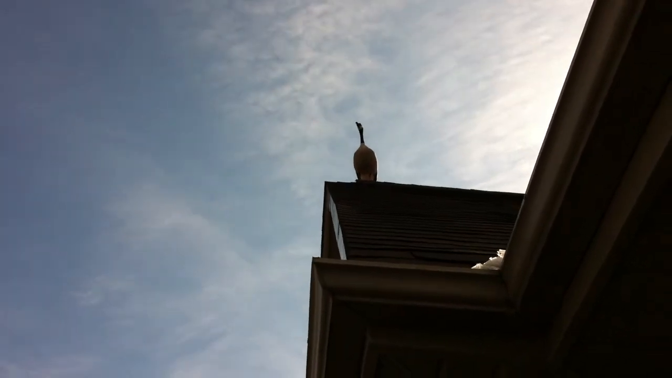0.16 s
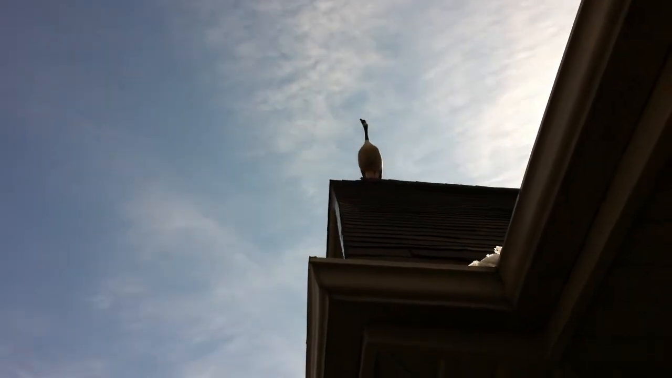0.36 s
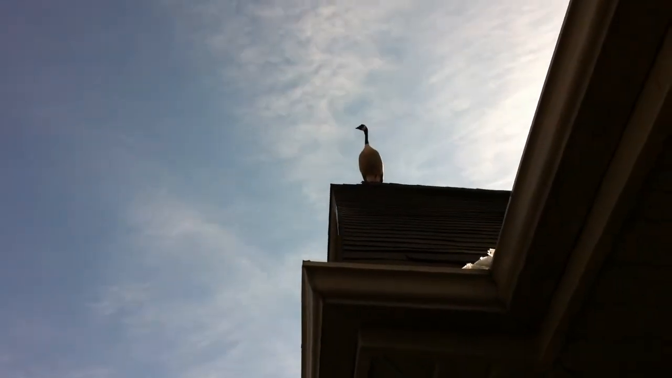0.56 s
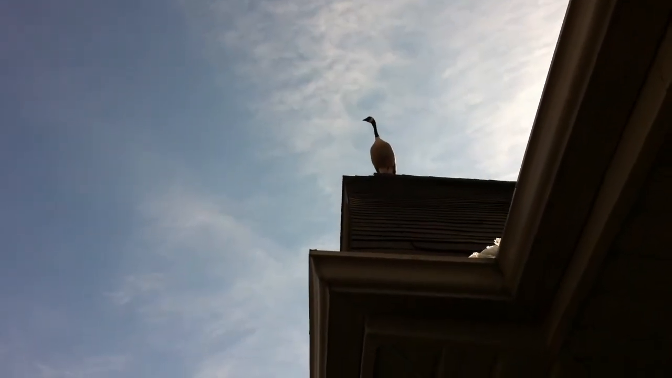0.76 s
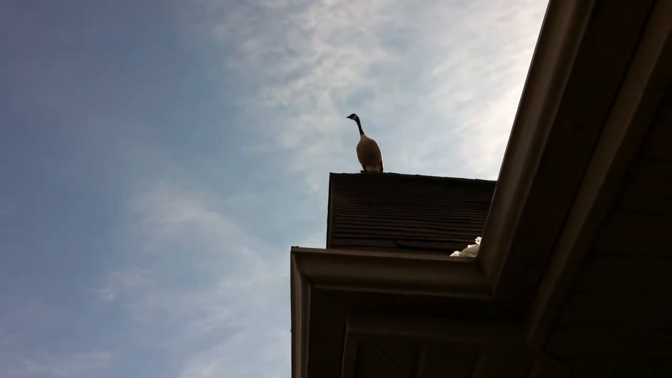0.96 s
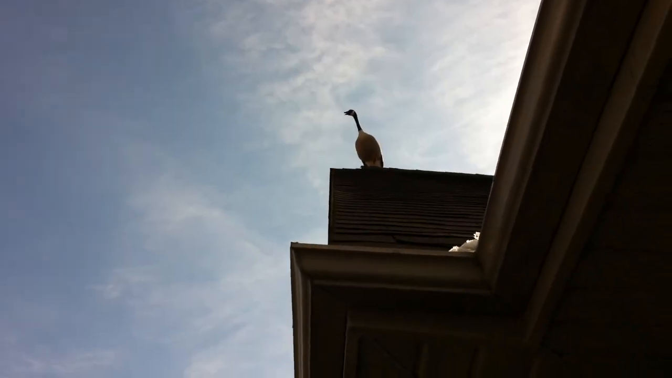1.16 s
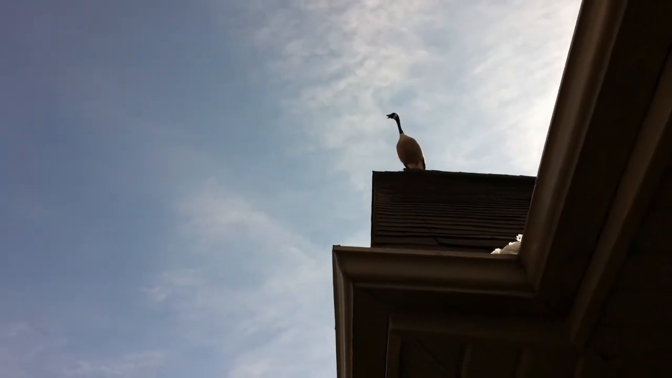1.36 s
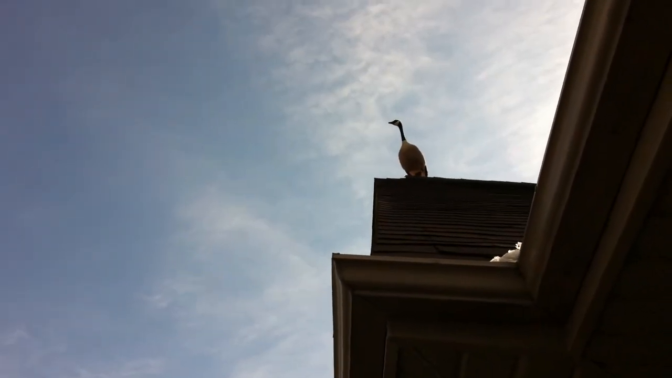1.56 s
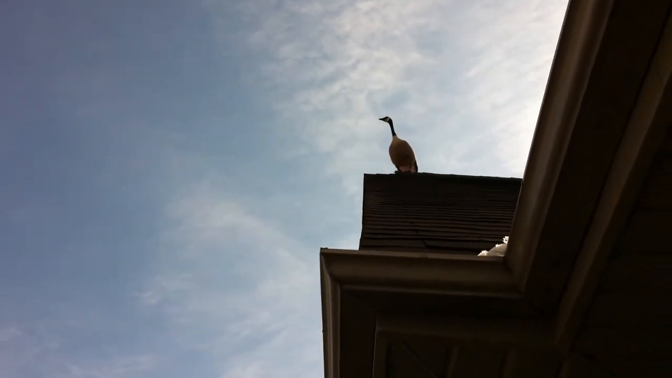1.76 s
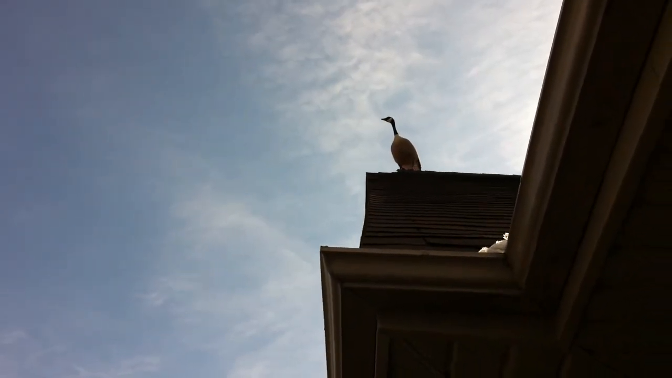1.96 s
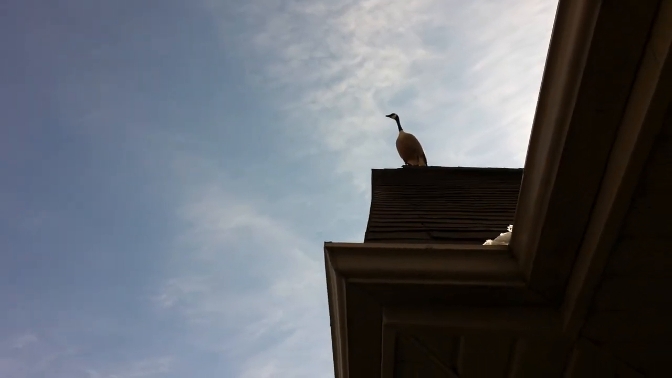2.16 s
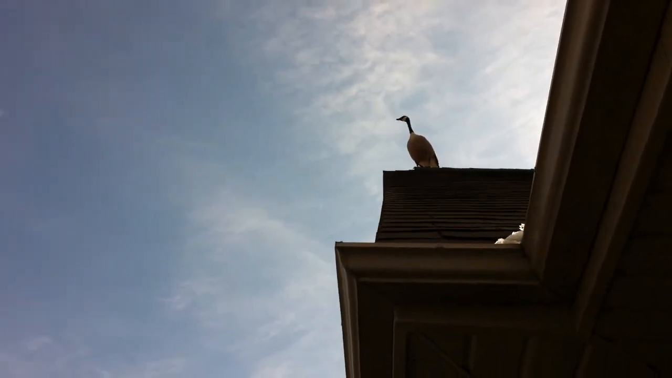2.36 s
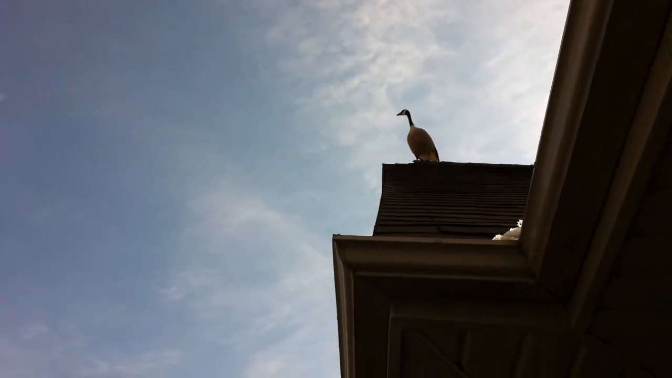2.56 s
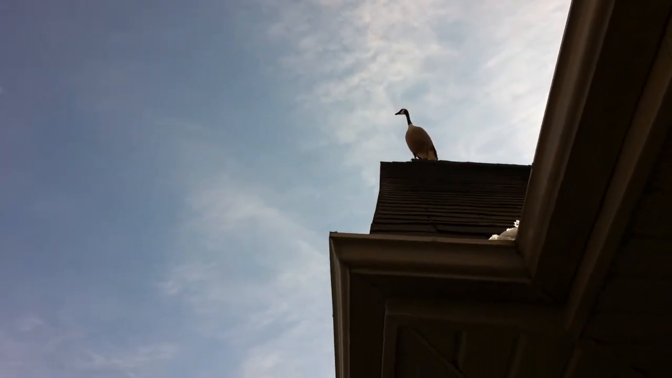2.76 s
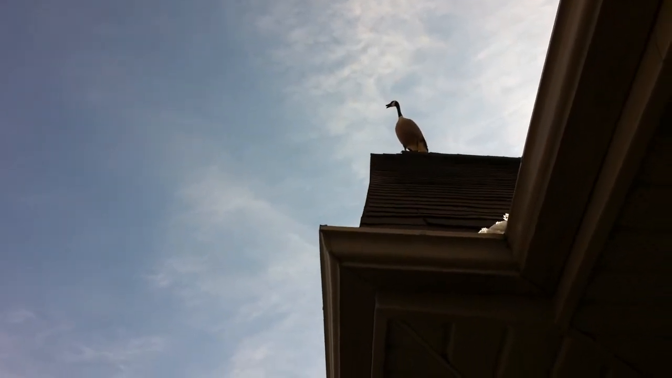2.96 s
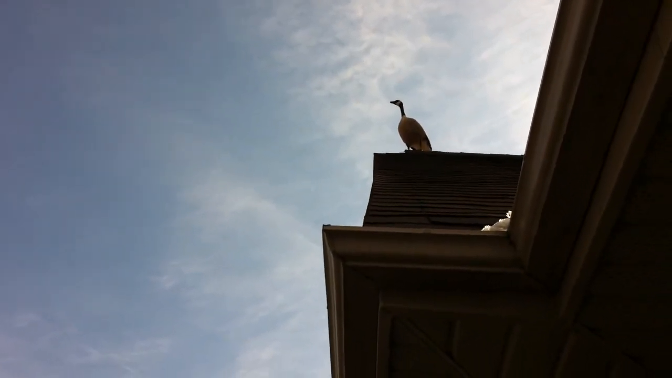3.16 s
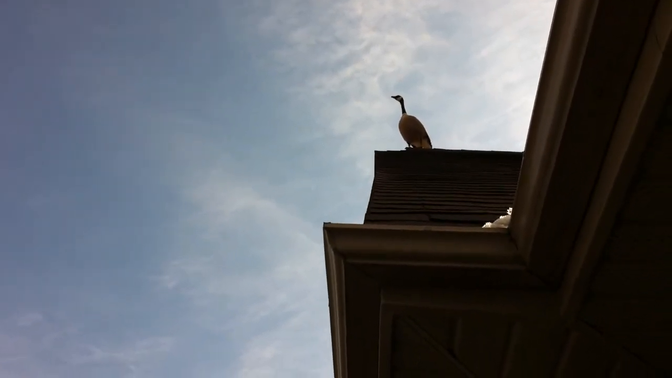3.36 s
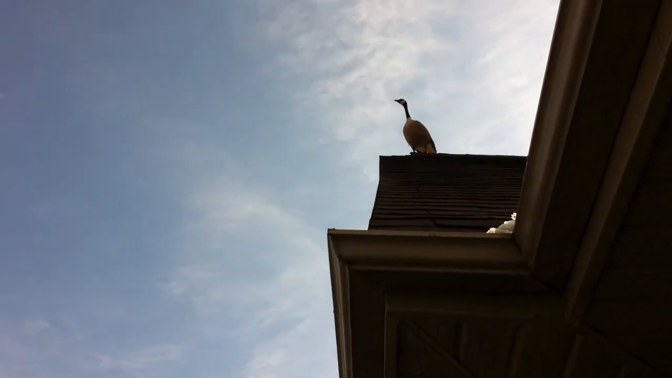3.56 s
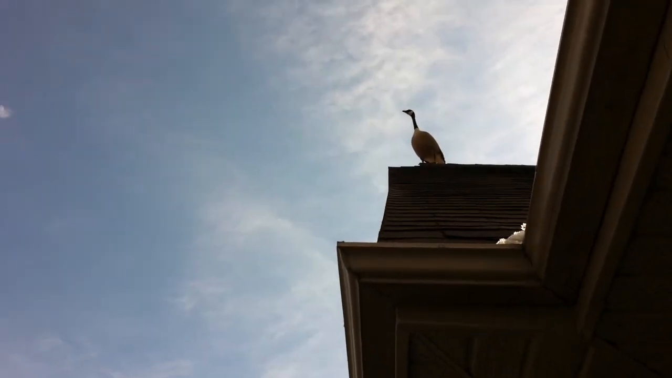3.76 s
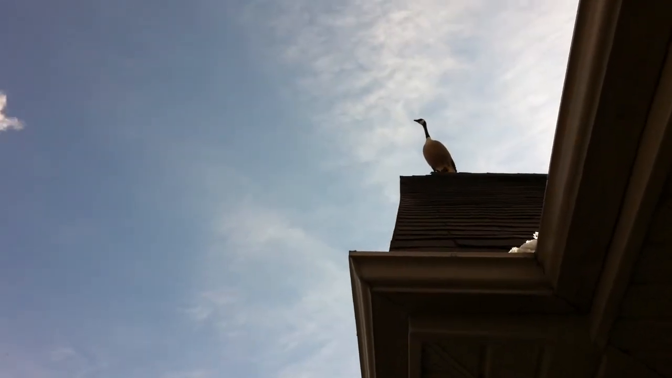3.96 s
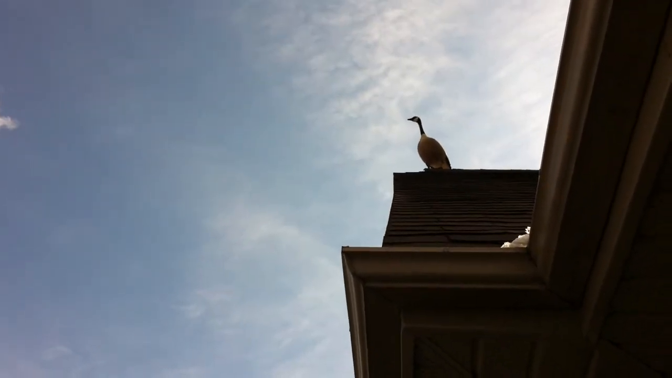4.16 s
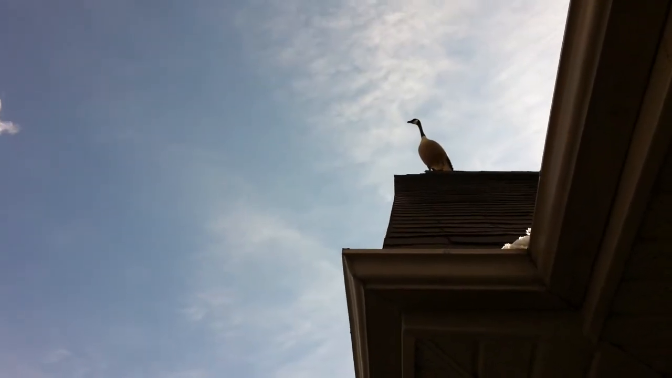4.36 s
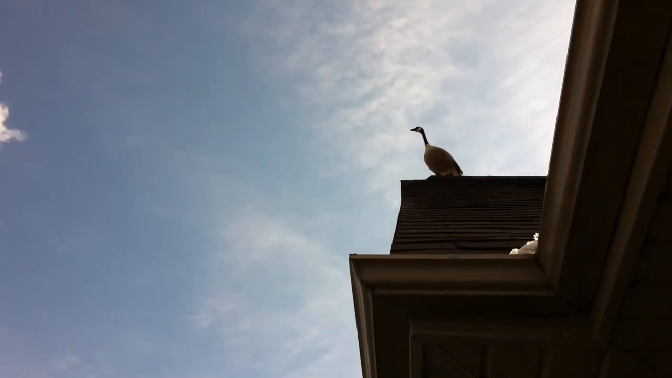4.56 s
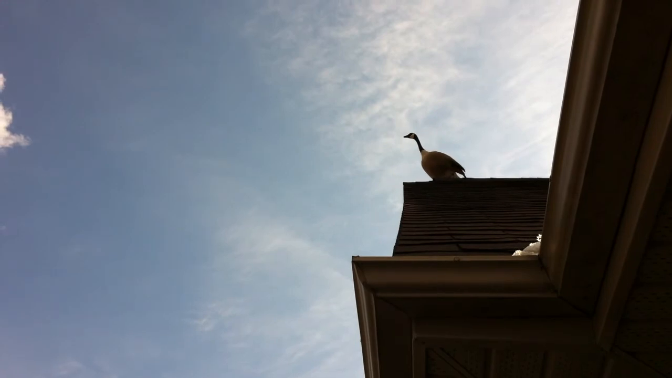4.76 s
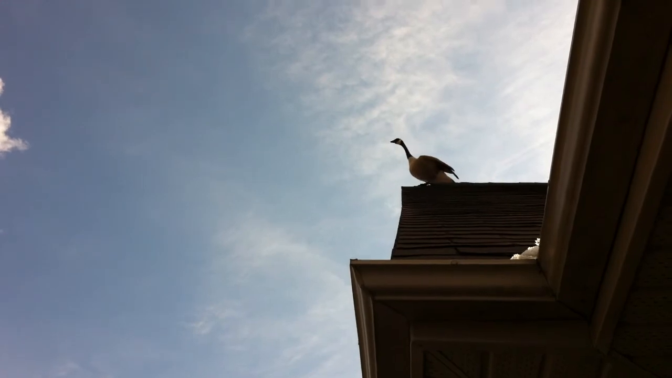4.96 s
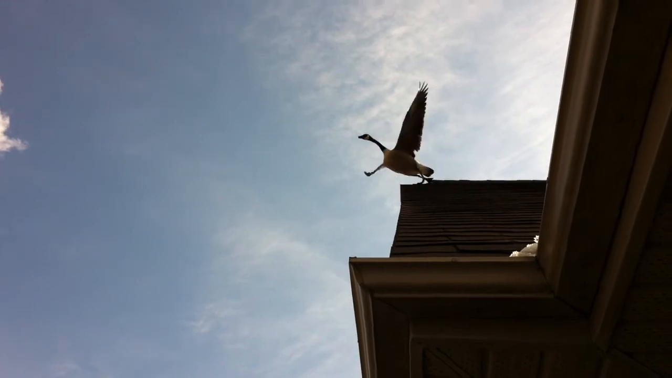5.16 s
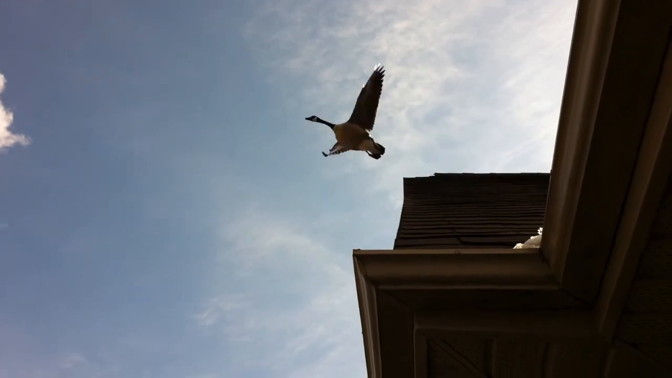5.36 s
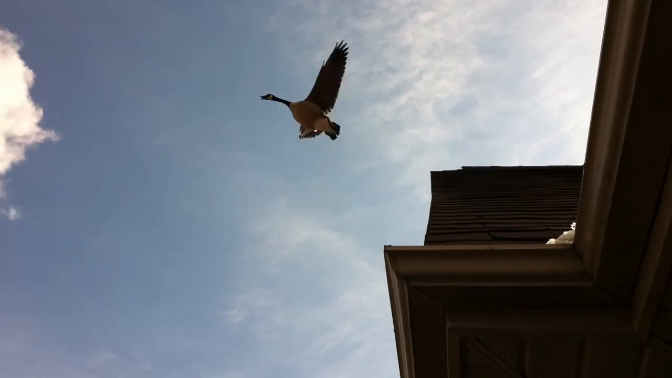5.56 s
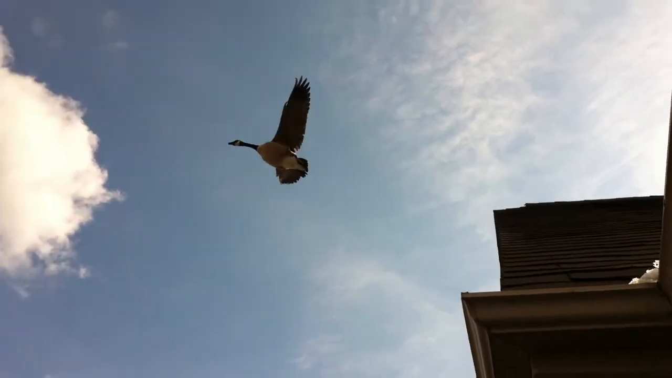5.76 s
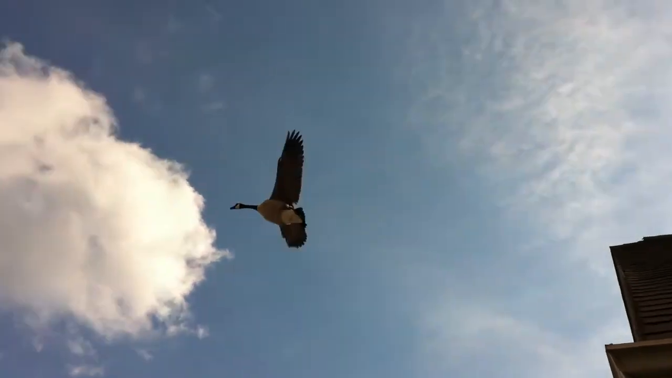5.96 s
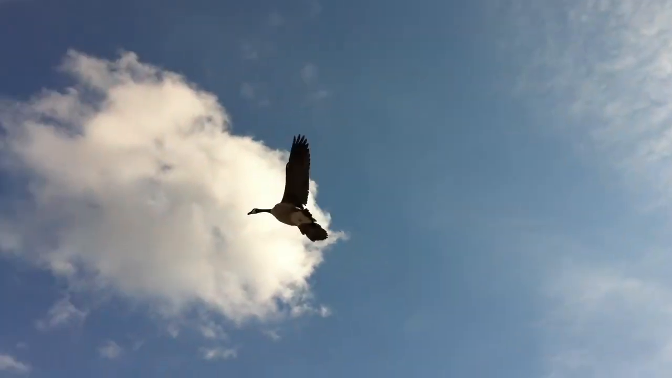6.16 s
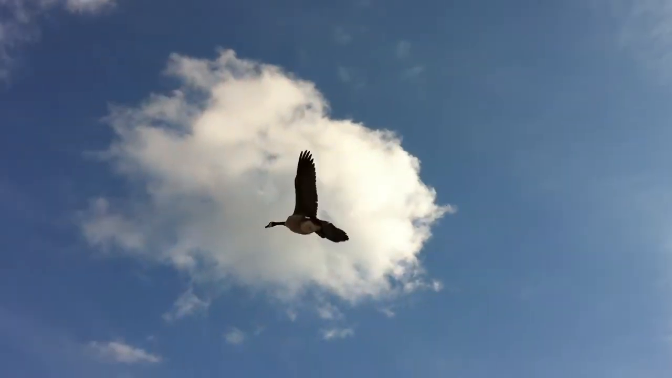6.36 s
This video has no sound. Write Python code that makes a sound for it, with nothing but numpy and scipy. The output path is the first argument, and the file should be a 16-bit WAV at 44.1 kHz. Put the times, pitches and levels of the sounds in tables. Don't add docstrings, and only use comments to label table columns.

```python
import sys
import numpy as np
from scipy import signal
from scipy.io import wavfile
from scipy.ndimage import uniform_filter1d

SR = 44100
rng = np.random.default_rng(int(sys.argv[2]) if len(sys.argv) > 2 else 0)


def invert_db(level):
    return 10 ** (np.asarray(level, dtype=float) / 20)


def bounce(signal):
    frames = np.transpose(np.atleast_2d(signal))
    limited = np.clip(frames, -1, 1)
    pcm = np.round(limited * 32767).astype(np.int16)
    wavfile.write(sys.argv[1], SR, pcm)


N = 282681
SECONDS = np.arange(N) / SR


def rms_one(x):
    return x / np.sqrt(np.mean(x ** 2) + 1e-20)


def band(x, hz, kind, order=4):
    return signal.sosfilt(signal.butter(order, hz, kind, fs=SR, output="sos"), x)


def resonate(x, hz, width):
    r = np.exp(-np.pi * width / SR)
    top = [(1 - r * r) / 2, 0, (r * r - 1) / 2]
    return signal.lfilter(top, [1, -2 * r * np.cos(2 * np.pi * hz / SR), r * r], x)


def drift(rate, size):
    r = np.exp(-2 * np.pi * rate / SR)
    settle = 9000
    slow = signal.lfilter([1], [1, -2 * r, r * r], rng.standard_normal(size + settle))
    return rms_one(slow[settle:])


def in_time(rows, fade):
    s, *columns = np.transpose(rows)
    t = np.arange(s[0] - fade - 900 / SR, min(s[-1] + fade, N / SR - 1e-3), 1 / SR)
    gate = np.clip(np.minimum(t - s[0], s[-1] - t) / fade + 1, 0, 1) ** 2
    return round(t[0] * SR), [np.interp(t, s, c) for c in columns], gate


def coloured(spectrum, patchy_db, rate):
    hz, db = np.transpose(spectrum)
    edges = np.geomspace(hz[0], hz[-1], 16)
    together = drift(rate, N)
    white = rng.standard_normal((2, N))
    out = np.zeros(N)
    for k, (low, high) in enumerate(zip(edges, edges[1:])):
        level_db = np.interp(np.log(low * high) / 2, np.log(hz), db)
        flicker_db = patchy_db * (1.23 * together + drift(6.3, N))
        out += invert_db(level_db + flicker_db) * band(white[k % 2], [low, high], "band", order=2)
    return rms_one(out)


# t/s, level/dB
AIR_STIR = [(0, -1), (1.0, -1), (2.0, -2.5), (3.0, -1), (3.6, 2), (4.15, 1.5), (4.5, 5), (5.0, 6.5),
            (5.37, 7.5), (5.84, 7.5), (6.41, 9)]


def air_stir():
    return np.interp(SECONDS, *np.transpose(AIR_STIR))


# f/Hz, level/dB per Hz
WIND_COLOUR = [(12, -65), (20, -28), (38, -19.5), (92, -10.5), (157, 6), (392, 3), (433, 0.5), (600, -37),
               (780, -40), (1320, -120)]


def wind(stir_db):
    return invert_db(-58 + stir_db) * coloured(WIND_COLOUR, patchy_db=1.0, rate=3.0)


# f/Hz, level/dB per Hz
TRAFFIC_COLOUR = [(180, -8), (300, -25), (361, 1), (473, -8.5), (691, 1), (849, -4), (1080, -4), (1590, -9),
                  (2560, -27.5), (4000, -42), (5200, -16.5), (8800, -120)]


def traffic(stir_db, honk_level):
    level = invert_db(-52.5 + 0.92 * stir_db) + invert_db(-27) * honk_level
    return level * coloured(TRAFFIC_COLOUR, patchy_db=1.6, rate=0.71)


def rush(stir_db, honk_level):
    level = invert_db(-83.5 + 2.1 * stir_db) + invert_db(-34) * honk_level
    return level * rms_one(band(rng.standard_normal(N), [1700, 3600], "band", order=1))


def hiss():
    return invert_db(-70) * rms_one(band(rng.standard_normal(N), 2100, "high", order=1))


# t/s, f/Hz, level/dB
WHISTLES = [
    [(2.42, 3120, -76), (2.45, 3020, -70), (2.49, 2920, -74)],
    [(2.51, 3130, -75), (2.55, 3090, -71), (2.6, 3060, -78)],
]


def songbird():
    out = np.zeros(N)
    for rows in WHISTLES:
        start, (hz, db), gate = in_time(rows, 0.0067)
        turn = 2 * np.pi * np.cumsum(hz) / SR
        out[start:start + len(gate)] += invert_db(db) * gate * (np.sin(turn) + .55 * np.sin(1.27 * turn))
    return out


# t/s, peak level/dB
FEATHER_CLAPS = [
    (4.0194, -53),
    (5.1647, -48),
    (5.1834, -43),
    (5.219, -40.5),
    (5.357, -40),
    (5.3613, -35.5),
    (5.5894, -66),
    (5.9094, -57),
]
# t/s, level/dB
STROKES = [
    (5.12, -70),
    (5.37, -58),
    (5.591, -60),
    (5.9, -62.5),
    (6.19, -65),
]


def wings():
    out = np.zeros(N)
    t = np.arange(2000) / SR
    t60_s = 0.019
    for s, db in FEATHER_CLAPS:
        burst = resonate(rng.standard_normal(len(t)), hz=8000, width=5100) * invert_db(-60 * t / t60_s)
        start = round(s * SR)
        out[start:start + len(t)] += invert_db(db) * burst / np.abs(burst).max()
    strokes = sum(invert_db(db) * np.exp(-((SECONDS - s) / .045) ** 2) for s, db in STROKES)
    swish = rms_one(band(rng.standard_normal(N), [1800, 11000], "band", order=1))
    return out + strokes * invert_db(2.2 * drift(53.6, N)) * swish


def walls(x, slaps, echoes, tail_db):
    t = np.arange(2 * SR) / SR
    t60_s = 3.1
    noise = rng.standard_normal((2, len(t))) / np.sqrt(SR)
    tail = noise[0] * invert_db(tail_db - 60 * t / t60_s) * np.minimum(t / 0.034, 1) * np.sqrt(14 / t60_s)
    eaves = invert_db(20) * resonate(tail, hz=1548, width=8)
    smears = sum(invert_db(db) * np.exp(-((t - delay) / smear) ** 2) / np.sqrt(smear)
                 for delay, smear, db in echoes)
    far = band(tail + eaves + smears * noise[1], 3200, "low", order=3)
    near = np.zeros(len(t))
    for delay, db in slaps:
        near[round(delay * SR)] = invert_db(db)
    near = band(near, 2600, "low", order=2)
    return x + signal.fftconvolve(x, far + near)[:N]


# delay t/s, level/dB
PERCH_SLAPS = [(0.0132, -10), (.017, -7), (0.028, -20.5), (.044, -19.5)]
# delay t/s, smear/s, level/dB
PERCH_ECHOES = [(.09, 0.036, -24), (.232, 0.014, -25.5), (0.273, 0.013, -30.5), (0.551, 0.051, -32),
                (0.753, 0.14, -37.5)]
# delay t/s, level/dB
TAKEOFF_SLAPS = [(.0085, -5.5), (.017, -3.5), (0.042, -29), (0.05, -30)]
# delay t/s, level/dB
OVERHEAD_SLAPS = [(.012, -13.5), (.016, -6.5), (.024, -13), (.035, -14)]
# delay t/s, smear/s, level/dB
FLIGHT_ECHOES = [(0.099, 0.0023, -22), (0.251, 0.028, -29)]


def surroundings(bird):
    perched = SECONDS < 5.38
    overhead = SECONDS > 5.95
    out = walls(bird * perched, PERCH_SLAPS, PERCH_ECHOES, tail_db=-31.5)
    out += walls(bird * (~perched & ~overhead), TAKEOFF_SLAPS, FLIGHT_ECHOES, tail_db=-39)
    out += walls(bird * overhead, OVERHEAD_SLAPS, FLIGHT_ECHOES, tail_db=-39)
    return out


TOP_HZ = 15900


def voice(tables, tract, jitter, shimmer_db, breath, fade):
    out = np.zeros(N)
    low, mid, high = 950, 2150, 6500
    for rows in tables:
        start, (hz, *levels_db), gate = in_time(rows, fade)
        size = len(gate)
        cycles = np.cumsum(hz * (1 + jitter * drift(160, size))) / SR
        multiples = np.arange(1, int(TOP_HZ / hz.max()))[:, None]
        pulses = rms_one(np.cos(2 * np.pi * multiples * cycles).sum(axis=0))
        shimmer = rng.standard_normal(size)[(cycles + .5).astype(int)]
        pulses = pulses * invert_db(shimmer_db * shimmer)
        air = breath * band(rng.standard_normal(size), 6000, "high", order=3)
        source = pulses + air * (1 + np.cos(2 * np.pi * cycles))
        sung = sum((-1) ** k * invert_db(db) * resonate(source, f, w) for k, (f, w, db) in enumerate(tract))
        parts = [band(sung, edges, "band") for edges in ([400, low], [low, mid], [mid, high])]
        parts.append(band(sung, high, "high"))
        for part, db in zip(parts, levels_db):
            even = part / np.sqrt(uniform_filter1d(part ** 2, 1100, mode="mirror") + 1e-9)
            out[max(start, 0):start + size] += (even * invert_db(db) * gate)[max(-start, 0):N - start]
    return out


def phrase(calls, shape, bands, pitch):
    share, effort_db, open_db = np.transpose(shape)
    fine = np.linspace(0, 1, num=25)
    effort_db = np.interp(fine, share, effort_db)
    open_db = np.interp(fine, share, open_db)
    tables = []
    for s, length, hz, db, bright_db in calls:
        columns = [s + length * fine, pitch(hz, fine, length)]
        for offset_db, by_effort, by_opening in bands:
            opening = open_db + bright_db * (by_opening > 0)
            columns.append(db + offset_db + by_effort * effort_db + by_opening * opening)
        tables.append(np.transpose(columns))
    return tables


# t/s, length/s, end pitch f/Hz, level/dB, brightness/dB
GROWL_CALLS = [
    (-.195, 0.21, 177.2, -30.5, -4),
    (1.25, 0.24, 170.2, -29, -2.5),
    (2.98, 0.23, 168, -29.5, -2.5),
    (4.51, 0.15, 161, -30, 3.5),
    (4.935, .08, 167.8, -24.5, -3),
    (5.195, .067, 170, -24, -3),
]
# share of length, effort/dB, beak opening/dB
GROWL_COURSE = [(0, -28, -8), (0.249, -20.5, 4.5), (.45, -10.5, -1), (.65, -11, -4), (.8, -9, -3),
                (.92, -4.5, -16), (1, -2, 0)]
# offset level/dB, share of effort, share of opening
GROWL_BALANCE = [(-13, 0.65, 0), (1, 1.32, 0), (-23.5, 0.86, 0.77), (-38.5, 0.47, 1.0)]
# f/Hz, width/Hz, level/dB
CLOSED_TRACT = [(427, 34, -10), (910, 275, -12), (1237, 44, 6), (1510, 85, 4.5), (1970, 180, -17),
                (4200, 230, -8.5), (5040, 1000, -17), (7440, 630, -30), (11800, 2700, -53)]


def growls():
    def rise(hz, u, length):
        return hz - 175 * length * (1 - u)
    tables = phrase(GROWL_CALLS, GROWL_COURSE, GROWL_BALANCE, rise)
    return voice(tables, CLOSED_TRACT, jitter=.003, shimmer_db=1.0, breath=.5, fade=.015)


def rough_pitch(hz, u, length):
    return hz * (1 + 0.05715 * (u - .5))


# t/s, length/s, f/Hz, level/dB, brightness/dB
BREAK_CALLS = [
    (.02, 0.1, 273.9, -19.5, -4),
    (1.462, 0.12, 272, -22.5, -2),
    (3.195, 0.12, 277.5, -24, -1),
    (4.662, 0.082, 181.8, -25.5, 4.5),
    (5.008, 0.06, 186.2, -24, -1),
    (5.256, 0.069, 185.6, -27, 8),
]
# share of length, effort/dB, beak opening/dB
BREAK_COURSE = [(0, -12, -5), (.17, -4, -6), (.36, 0, 0), (.42, -3, 1), (.5, -18, 8), (.75, -22, 6),
                (1.1, -40, 4)]
# offset level/dB, share of effort, share of opening
BREAK_BALANCE = [(-12, 1.84, -0.78), (-0.5, 0.93, 0.23), (-16, 0.68, 0.92), (-29, 1, 0.62)]
# f/Hz, width/Hz, level/dB
BENT_TRACT = [(580, 250, -10.5), (840, 300, -11.5), (1148, 182, 4), (1396, 233, 2.5), (2580, 1300, -30),
              (4230, 620, -12.5), (4780, 810, -14.5), (7600, 840, -32.5), (11700, 1400, -42)]


def rough_breaks():
    tables = phrase(BREAK_CALLS, BREAK_COURSE, BREAK_BALANCE, rough_pitch)
    return voice(tables, BENT_TRACT, jitter=.028, shimmer_db=2.2, breath=.5, fade=.015)


# t/s, length/s, f/Hz, level/dB, brightness/dB
NOTE_CALLS = [
    (.063, .058, 788.7, -20, 7.5),
    (1.503, 0.06, 791.7, -20.5, 6.5),
    (3.236, 0.062, 787, -22, 3),
    (4.685, 0.054, 768, -21.5, 5.5),
    (5.022, 0.0413, 756.7, -25.5, 1.5),
    (5.265, 0.05, 772.4, -22, 9),
]
# share of length, effort/dB, beak opening/dB
NOTE_COURSE = [(0, -6, -7), (.12, -5.5, 2), (.35, 1, 3.5), (.6, -2.5, 0.5), (.78, -10.5, -6),
               (1, -18.5, 1.5)]
# offset level/dB, share of effort, share of opening
NOTE_BALANCE = [(-12.5, 0.39, -0.77), (0.5, 1.2, -1.33), (-16.5, 0.62, 0.026), (-30.5, 0.59, 1.2)]
# f/Hz, width/Hz, level/dB
NOTE_TRACT = [(607, 286, -10.5), (800, 282, -8), (1277, 152.3, 3.5), (1451, 163.4, 2.5), (2740, 400, -25.5),
              (4206, 664, -10.5), (4720, 780, -12.5), (7450, 680, -37), (11840, 900, -43),
              (15300, 460, -42.5)]


def clear_notes():
    def sag(hz, u, length):
        return hz * (1 - np.interp(u, [0, .36, 1], [0, .015, .15]))
    tables = phrase(NOTE_CALLS, NOTE_COURSE, NOTE_BALANCE, sag)
    return voice(tables, NOTE_TRACT, jitter=.002, shimmer_db=.6, breath=1.4, fade=.006)


# t/s, length/s, top pitch f/Hz, level/dB, brightness/dB
TAKEOFF_CALLS = [
    (5.425, .125, 612, -22.5, 1.5),
]
SNAPPED_CALLS = [
    (5.675, 0.12, 613.9, -21, 1),
]
OVERHEAD_CALLS = [
    (6.27, 0.11, 617, -23, -1),
]
# t/s, length/s, f/Hz, level/dB, brightness/dB
SQUEAK_CALLS = [
    (6.045, 0.058, 857, -27.5, -2),
]
# t/s, length/s, f/Hz, level/dB, brightness/dB
HOARSE_CALLS = [
    (6.02, 0.084, 217.2, -30, -2.5),
    (6.05, .09, 285, -30.5, 9.5),
    (6.268, 0.041, 282, -28, -5),
]
# share of length, effort/dB, beak opening/dB
TAKEOFF_COURSE = [(0, -17, 1), (.11, -0.5, -6), (.42, 1.5, 2), (.7, -2, 0.5), (.85, -16.5, 1),
                  (1, -38, 5.5)]
SNAPPED_COURSE = [(0, -8, 0), (.08, -5, -2), (.38, 0, 2), (.62, -0.5, -2), (.8, -10, -2), (1, -36, 6)]
SQUEAK_COURSE = [(0, -3, -12), (0.399, 5, 9), (.8, -3.5, 10), (1, -11, -7)]
# offset level/dB, share of effort, share of opening
FLIGHT_BALANCE = [(-16, 1, -0.6), (-2, 1.18, 1), (-18, 0.97, 2.5), (-29.5, 0.87, 4)]
OVERHEAD_BALANCE = [(-2, 2.2, 2), (1.5, 1.14, 1.5), (-12.5, 1.2, 3.5), (-19.5, 0.87, 3.5)]
SQUEAK_BALANCE = [(-7, 1.1, 0), (0, 1.01, 0), (-26, .9, 1.0), (-32, .8, 1.0)]
HOARSE_BALANCE = [(-10, 0.45, 0), (0, 0.77, 0.27), (-13.5, 1.2, 0.93), (-27, 0.78, 1.4)]
# f/Hz, width/Hz, level/dB
OPEN_TRACT = [(580, 120, -11.5), (1200, 133, 3.5), (1588, 225, 0), (2350, 320, -14.5), (2780, 690, -16),
              (4220, 640, -6), (4930, 1100, -12.5), (8060, 2200, -28), (11100, 2100, -36.5),
              (15400, 1600, -46)]


def flight_honks():
    def arch(hz, u, length):
        top = .42
        scoop = 0.14 * np.clip(1 - u / top, 0, 1) ** 1.6
        sag = 0.051 * np.clip((u - top) / 0.302, 0, 1)
        return hz * (1 - scoop - sag)

    def squeak(hz, u, length):
        return hz * (1 - 0.0266 * u)
    clear = phrase(TAKEOFF_CALLS, TAKEOFF_COURSE, FLIGHT_BALANCE, arch)
    clear += phrase(SNAPPED_CALLS, SNAPPED_COURSE, FLIGHT_BALANCE, arch)
    clear += phrase(OVERHEAD_CALLS, SNAPPED_COURSE, OVERHEAD_BALANCE, arch)
    clear += phrase(SQUEAK_CALLS, SQUEAK_COURSE, SQUEAK_BALANCE, squeak)
    hoarse = phrase(HOARSE_CALLS, BREAK_COURSE, HOARSE_BALANCE, rough_pitch)
    out = voice(clear, OPEN_TRACT, jitter=.006, shimmer_db=1.4, breath=1.2, fade=.003)
    out += voice(hoarse, OPEN_TRACT, jitter=.03, shimmer_db=3.5, breath=.6, fade=.004)
    return out


def goose():
    return growls() + rough_breaks() + clear_notes() + flight_honks()


def scene():
    bird = goose()
    stir_db = air_stir()
    honk_level = np.sqrt(np.abs(uniform_filter1d(bird ** 2, round(0.14 * SR))))
    background = wind(stir_db) + traffic(stir_db, honk_level) + rush(stir_db, honk_level) + hiss()
    return (background + songbird() + wings() + surroundings(bird))[None]


def roll_off(x):
    return signal.sosfilt(signal.butter(12, 16460, fs=SR, output="sos"), x)


def record(dry):
    steep = signal.ellip(12, .3, 70, TOP_HZ - 100, fs=SR, output="sos")
    mix = signal.sosfilt(steep, dry)
    return roll_off(mix)


dry = scene()
out = record(dry)
bounce(out)
```